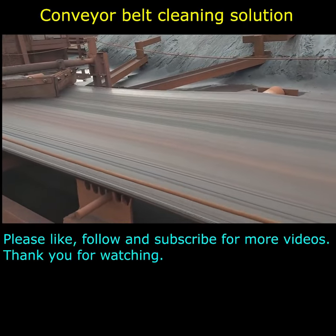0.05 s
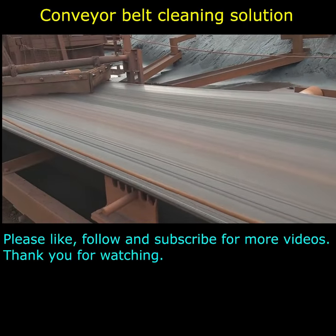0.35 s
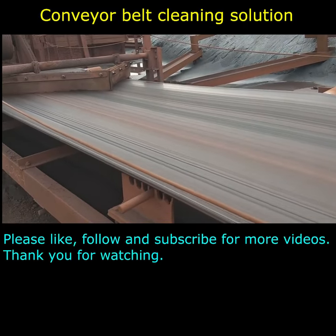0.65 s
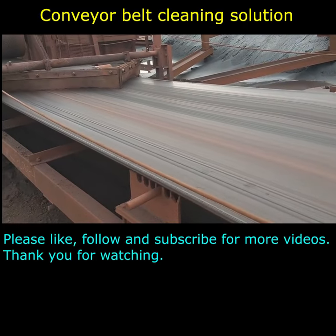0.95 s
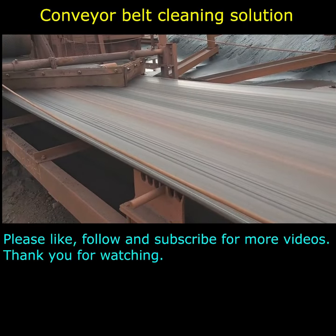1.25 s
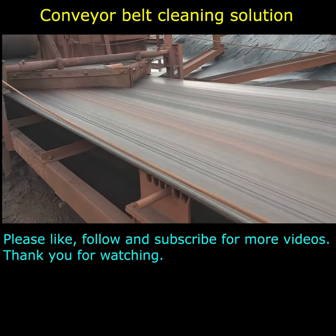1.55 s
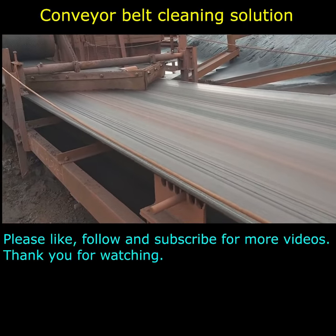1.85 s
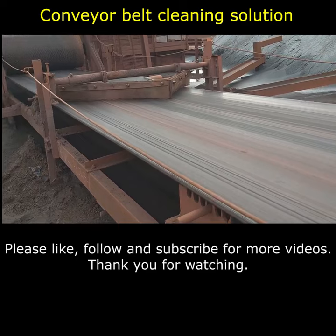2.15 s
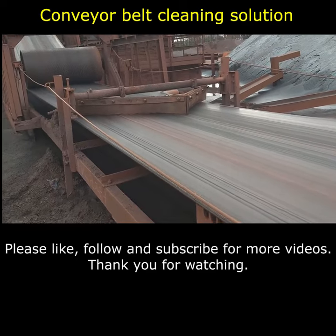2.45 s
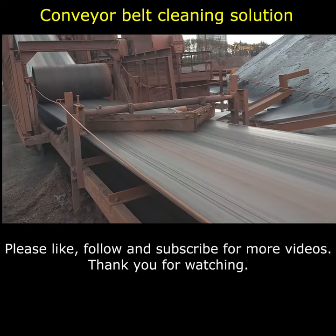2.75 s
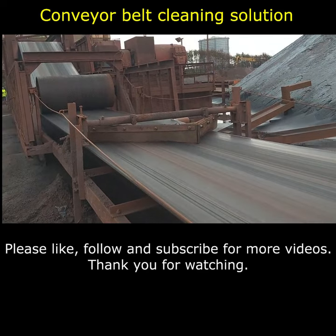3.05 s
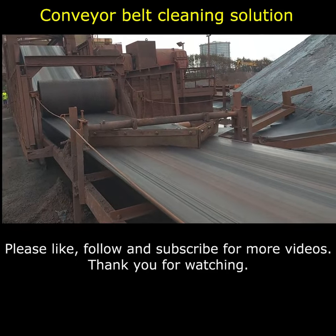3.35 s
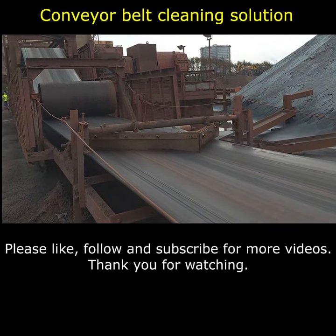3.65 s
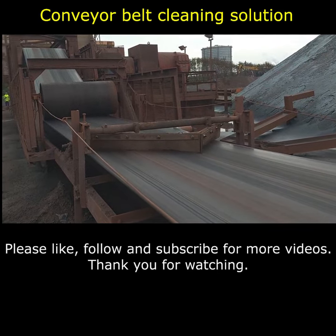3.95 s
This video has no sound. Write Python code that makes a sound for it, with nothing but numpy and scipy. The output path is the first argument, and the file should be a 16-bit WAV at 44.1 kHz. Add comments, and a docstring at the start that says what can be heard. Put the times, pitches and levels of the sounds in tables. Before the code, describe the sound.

An industrial conveyor rumbles and hisses while a worn roller clatters quickly against its steel frame.

```python
"""Outdoors at a plant, a wide conveyor belt runs with a low rumble and the hiss of rubber on rollers.
Once a turn, about nine times a second, a worn roller knocks and rattles in its steel frame,
in runs that swell and fade. Grit ticks on the steel, and the hollow roar of the end drum grows.
A gust of wind ruffles the left and right openings of the microphone."""
import sys
import numpy as np
from scipy import signal
from scipy.fft import rfft, irfft
from scipy.io import wavfile
from scipy.ndimage import uniform_filter1d

SR = 44100
rng = np.random.default_rng(int(sys.argv[2]) if len(sys.argv) > 2 else 0)


def dump(signal):
    """Clip the signal to [-1, 1] and save it as 16-bit WAV at the path in sys.argv[1]."""
    limited = np.clip(np.atleast_2d(signal).T, -1, 1)
    pcm = np.round(limited * 32767).astype(np.int16)
    wavfile.write(sys.argv[1], SR, pcm)


N = 176400
TIME = np.arange(N) / SR

# the notes at which the roller and its frame ring: f/Hz, level/dB
STEEL_NOTES = [(490, 0), (575, -1), (655, 3.5), (952, 0.5), (1112, -1), (1394, -6), (1785, 5.5), (1991, 3),
               (2164, 4), (2465, -1), (2934, -4), (3114, -7), (3243, 1), (3380, -3.5), (3883, -10)]
RING_S = 0.095  # time for the ringing to fade by 60 dB


def roller():
    """Each knock of the worn roller is a thump, a blow and a rattle, which set the steel clanging."""
    # when and how hard the roller knocks: t/s, level/dB
    knocks = [(.011, -4), (.231, 0), (.340, 0.5), (.449, 2), (0.56, -1.5), (.669, -3), (0.78, -6),
              (.887, -1.5), (0.992, -8.5), (1.1, -18), (1.211, -10), (1.317, -12), (1.429, -7),
              (1.541, -3.5), (1.648, 1), (1.758, -5.5), (1.867, -2.5), (1.971, 1), (2.081, -4.5),
              (2.189, -8), (2.299, -7.5), (2.408, -6), (2.517, -8), (2.626, -9), (2.734, -12), (2.845, -9),
              (3.611, -11.5), (3.714, -2.5), (3.826, -8), (3.931, -11)]
    # tone of the rattle: f/Hz, level/dB
    rattle_tone = [(400, -14.5), (1200, 4), (2100, -7.5), (3200, 9), (4300, -2), (6200, -14), (8000, -17),
                   (15000, -51)]
    # tone of the blow that starts each knock: f/Hz, level/dB
    blow_tone = [(150, -1), (600, -9), (1200, -3), (2000, 4), (3000, -2.5), (6000, -14), (15000, -37)]
    rise_s, hold_s, fall_db_per_s = 0.0054, 0.02, 480  # shape of each rattle
    impacts_per_s, spread_db = 2500, 4
    thump_hz, thump_fade_s, thump_ahead_s = 614, 0.0022, 0.0016
    blow_fade_s, clang_rise_s, scatter_db = 0.016, 0.0032, 1.2
    rattle_level, blow_level = np.zeros((2, N))
    ring, thumps = np.zeros((2, 2, N))
    t = TIME[:SR // 5]
    # the roller drops on its bracket
    drop = np.sin(2 * np.pi * thump_hz * t) * np.exp(-t / thump_fade_s)
    hz, note_db = np.transpose(STEEL_NOTES)
    clang_level = (1 - np.exp(-t / clang_rise_s)) * amp(-60 * t / RING_S)
    clang = clang_level * np.exp(2j * np.pi * hz[:, None] * t)
    for start, db in knocks:
        age = np.maximum(TIME - start, 0)
        fallen_db = fall_db_per_s * np.maximum(age - hold_s, 0)
        rattle_level += np.minimum(age / rise_s, 1) * amp(db - fallen_db)
        # the blow varies less than the rattle, and is a little lighter in the first second
        blow_db = 0.69 * db - 0.5 * max(1 - start / 1.03, 0)
        blow_level += (age > 0) * amp(blow_db) * np.exp(-age / blow_fade_s)
        push_db = np.where(hz < 1250, blow_db, db)  # the blow rings low notes, the rattle high ones
        strengths = amp(push_db + note_db + scatter_db * rng.standard_normal(len(hz)))
        phases = np.exp(2j * np.pi * rng.random((2, len(hz))))
        add(ring, start, ((strengths * phases) @ clang).real)
        add(thumps, start - thump_ahead_s, amp(-15.5 + db / 2) * drop[None])
    # the rattle is a shower of tiny impacts of random size
    sizes = amp(spread_db * np.minimum(rng.exponential(1, (2, N)), 2))
    signs = rng.choice([-1., 1.], (2, N))
    hits = rng.random((2, N)) < impacts_per_s / SR
    rattle = evened(colour(rattle_level * sizes * signs * hits, rattle_tone))
    blows = evened(colour(blow_level * rng.standard_normal((2, N)), blow_tone))
    return thumps * [[1], [0]] + amp(-33) * evened(ring) + amp(-36) * rattle + amp(-36.5) * blows


def rumble():
    """The moving belt and its drive rumble and shake the frame, which drones at two low pitches."""
    # drones of the frame: f/Hz, width/Hz, level/dB
    drones = [(105.9, 15, -33), (134.5, 2.6, -36.5)]
    # tone of the belt and drive: f/Hz, level/dB
    rumble_tone = [(30, -19), (52, -8), (68, -3.5), (83, -10), (115, -2), (170, -1.5), (215, -4.5),
                   (430, -12), (700, -46.5)]
    drone = sum(amp(db) * noise_band(hz, width) for hz, width, db in drones)
    return drone + amp(-27) * noise(rumble_tone, patch_db=1.5, size=4096)


def belt():
    """Rubber runs over the rollers: an uneven roar with a fine hiss on top."""
    # tone of the running rubber: f/Hz, level/dB
    rubber_tone = [(200, -74), (400, -50), (520, -56), (780, -53), (1220, -60), (1450, -58), (1800, -60.5),
                   (2400, -67.5), (3200, -65), (4000, -70.5), (5400, -73.5), (6300, -77.5), (7400, -81),
                   (8200, -87.5), (15500, -102)]
    # how the hiss and roar waver: t/s, hiss level/dB, roar level/dB
    wavering = [(0, 5.5, -1), (.4, 3, -2.5), (.8, 6, -0.5), (1.27, 2, -2.5), (1.6, 3, 0), (2.18, 4, -0.5),
                (2.24, 0.5, -2.5), (2.8, 1.5, -3), (3.4, 3, -1.5)]
    times, hiss_db, roar_db = np.transpose(wavering)
    rubber = noise(rubber_tone, patch_db=1.5, size=512)
    roar = signal.sosfiltfilt(signal.butter(2, 3000, fs=SR, output="sos"), rubber)
    hiss = rubber - roar
    roar_level = amp(np.interp(TIME, times, roar_db - roar_db.mean()))
    hiss_level = amp(np.interp(TIME, times, hiss_db - hiss_db.mean()))
    return amp(-26) * (roar * roar_level + hiss * hiss_level)


def grit():
    """Hard grains crack against the steel in sharp ticks."""
    # when and how hard a grain cracks: t/s, level/dB
    ticks = [(.231, -10.5), (.34, -7), (.448, -1), (1.649, -1.5), (1.934, -3.5)]
    # tone of a tick: f/Hz, level/dB
    tick_tone = [(1000, -6), (4000, 8), (9000, -12.5), (15000, -19)]
    fade_s = 0.00069
    bursts = sum((TIME > start) * amp(db) * np.exp(-abs(TIME - start) / fade_s) for start, db in ticks)
    return amp(-9) * colour(bursts * rng.standard_normal((2, N)), tick_tone)


def frame():
    """The passing belt rubs the steel and keeps it singing faintly between knocks."""
    hz = np.fft.rfftfreq(N, 1 / SR)
    width_hz = np.log(1000) / (np.pi * RING_S)  # a shorter ring makes a wider peak
    peaks = sum(amp(db) / (1 + ((hz - f) / width_hz) ** 2) for f, db in STEEL_NOTES)
    rubbed = peaks / (1 + (hz / 805) ** 2)  # rubbing stirs mostly the low notes
    return amp(-34.5) * evened(irfft(rfft(rng.standard_normal((2, N))) * rubbed, N))


def drum():
    """The belt wraps round the end drum with a hollow roar, louder as the microphone turns to it."""
    growth_db_per_s = 8
    level = amp(-35 + growth_db_per_s * (TIME - TIME[-1]))
    return level * noise_band(centre_hz=1370, width_hz=220)


def wind():
    """A gust buffets the microphone with a low, lumpy sound, pushing one side as it pulls the other."""
    # strength of the gust: t/s, level/dB
    gust = [(0, -28.5), (.8, -28), (1.2, -23), (1.45, -26.5), (2.05, -25.5), (2.2, -20.5), (2.95, -18),
            (4, -27)]
    # tone of the wind: f/Hz, level/dB
    wind_tone = [(25, 9), (55, 17.5), (100, 16.5), (170, 9.5), (300, 1), (600, -79)]
    level = amp(np.interp(TIME, *np.transpose(gust)))
    return level * pair(noise(wind_tone, patch_db=2.5, size=2048), likeness=-0.99)


def echo(x):
    """Sound bounces off the steelwork nearby and dies away quickly."""
    delay_s, fade_s = 0.006, 0.08
    t = TIME[:SR // 2]
    tail = rng.standard_normal((2, len(t))) * amp(-60 * t / fade_s) * (t > delay_s)
    return signal.oaconvolve(x, tail / np.linalg.norm(tail[0]), axes=1)[:, :N]


def microphone(machine):
    """Two openings set apart hear the machine in step at some pitches and out of step at others."""
    # how alike the two sides are: f/Hz, likeness (1 the same, -1 opposite)
    likeness = [(100, 0.87), (280, 0.62), (450, 0.52), (800, 0.79), (1150, 0.95), (1350, 0.8),
                (1750, -0.54), (2330, -0.95), (3150, 0.56), (3650, 1.0), (4300, -0.67), (4900, -0.85),
                (5700, 0.52), (6250, 0.98), (6750, -0.76), (8500, 0.64), (15000, 1.0)]
    # how much louder the left side is: f/Hz, level/dB
    balance = [(130, 5), (300, -4), (650, -4), (1250, 0), (1900, -1.5), (8000, 0)]
    # how far the left side runs ahead: f/Hz, lead (-1 to 1)
    left_lead = [(1000, -0.043), (2800, -0.33), (3950, .5), (5300, -.6), (6550, .5), (7200, -.4), (8000, 0)]
    hz = np.fft.rfftfreq(2 * N, 1 / SR)
    lean_db, lead = read(balance, hz) / 2, read(left_lead, hz)
    middle, other = rfft(machine, 2 * N)
    side = 1j * lead * middle + np.sqrt(1 - lead ** 2) * other  # 1j shifts by a quarter of a wave
    sides = pair([middle, side], read(likeness, hz))
    return irfft(sides * amp([lean_db, -lean_db]))[:, :N]


def amp(db):
    """Turns decibels into a number to multiply by."""
    return 10 ** (np.asarray(db) / 20)


def evened(x):
    """Scales a sound to an average power of 1."""
    return x / np.sqrt(np.mean(x ** 2) + 1e-20)


def read(points, hz):
    """Looks up a table between its rows, on a scale of pitch."""
    f, value = np.transpose(points)
    return np.interp(np.log(hz + 1), np.log(f + 1), value)


def colour(x, tone, size=4096):
    """Gives a sound a tone, with a filter that rings only after each hit."""
    db = read(tone, abs(np.fft.fftfreq(size, 1 / SR)))
    log_gain = np.log(amp(np.maximum(db, -100)))
    taps = np.fft.ifft(np.exp(np.conj(signal.hilbert(log_gain)))).real[:size // 2]
    return signal.oaconvolve(x, taps[None], axes=1)[:, :N]


def noise(tone, patch_db, size):
    """Two unrelated noises of one tone, with drifting louder and softer patches."""
    steps, hz = N // (size // 4) + 5, np.fft.rfftfreq(size, 1 / SR)
    a, b, c, d, patches = rng.standard_normal((steps, len(hz), 5)).T
    patches = uniform_filter1d(patches, size=10, axis=0)  # smooth over pitch
    patches = evened(uniform_filter1d(patches, size=6, axis=1))  # and over time
    spectra = np.array([a + 1j * b, c + 1j * d]) * amp(read(tone, hz)[:, None] + patch_db * patches)
    return evened(signal.istft(spectra, nperseg=size, noverlap=size * 3 // 4)[1][:, :N])


def noise_band(centre_hz, width_hz):
    """Two unrelated noises gathered round one pitch."""
    distance = (np.fft.rfftfreq(N, 1 / SR) - centre_hz) / width_hz
    return evened(irfft(rfft(rng.standard_normal((2, N))) / (1 + distance ** 2), N))


def pair(x, likeness):
    """Mixes two sounds into a left and a right that are more or less alike."""
    same = np.clip(likeness, -.99, .99)
    middle, side = x[0] * np.sqrt((1 + same) / 2), x[1] * np.sqrt((1 - same) / 2)
    return np.array([middle + side, middle - side])


def add(mix, start_s, sound):
    """Adds a sound into the mix at a given time."""
    part = mix[:, max(round(start_s * SR), 0):][:, :sound.shape[1]]
    part += sound[:, :part.shape[1]]


def scene():
    """The whole conveyor as the microphone hears it, plus the wind."""
    knocks = roller()
    machine = knocks + amp(-7) * echo(knocks) + grit() + frame() + drum() + rumble() + belt()
    return microphone(machine) + wind()


def record(dry):
    """Trims away the deepest bass and the highest treble."""
    lowest_hz, highest_hz = 46, 15830
    trimmed = signal.sosfilt(signal.butter(6, lowest_hz, "high", fs=SR, output="sos"), dry)
    treble_cut = signal.firwin(801, highest_hz, window=("kaiser", 9), fs=SR)
    return signal.oaconvolve(trimmed, treble_cut[None], "same")


dry = scene()
out = record(dry)
dump(out)
```